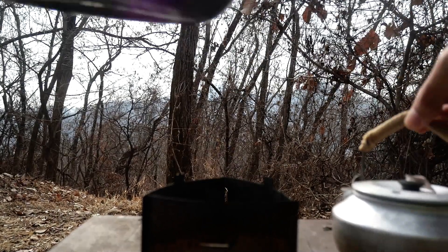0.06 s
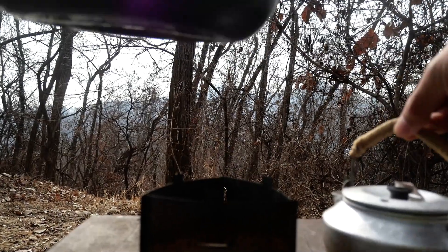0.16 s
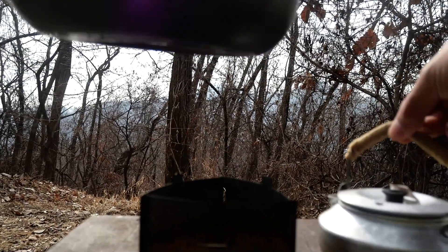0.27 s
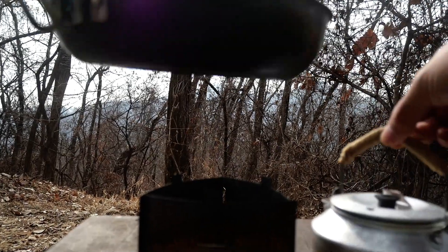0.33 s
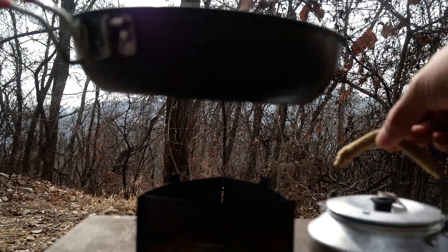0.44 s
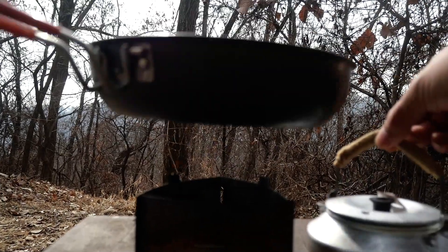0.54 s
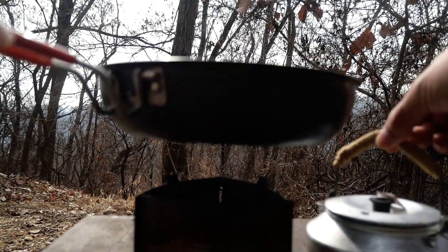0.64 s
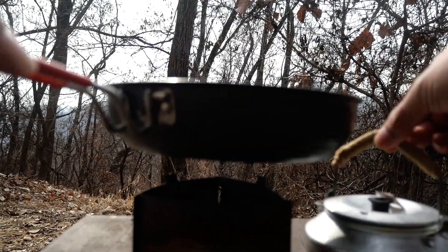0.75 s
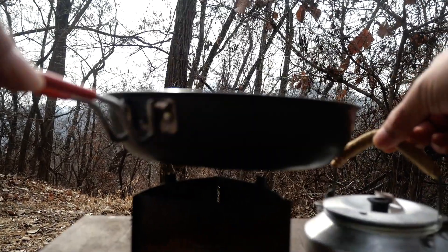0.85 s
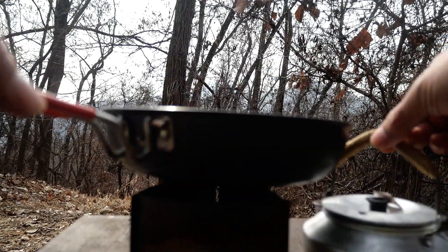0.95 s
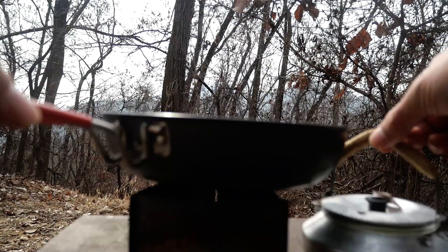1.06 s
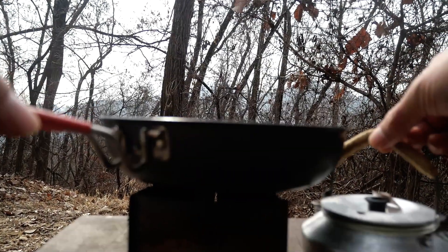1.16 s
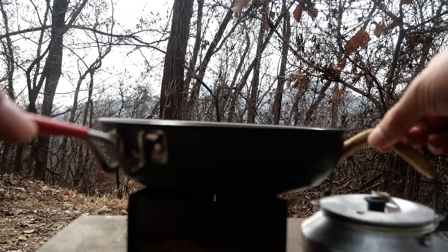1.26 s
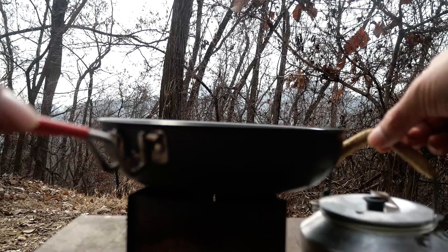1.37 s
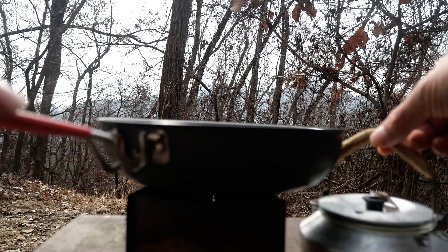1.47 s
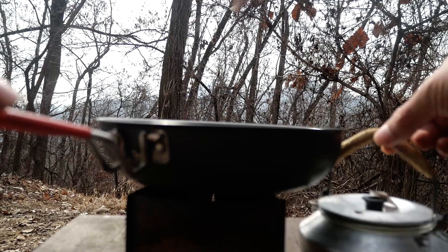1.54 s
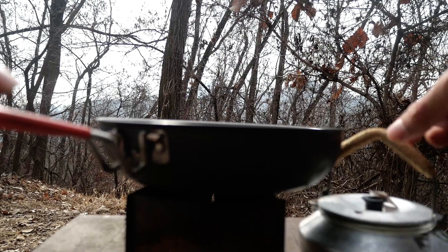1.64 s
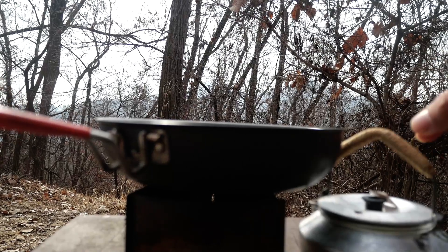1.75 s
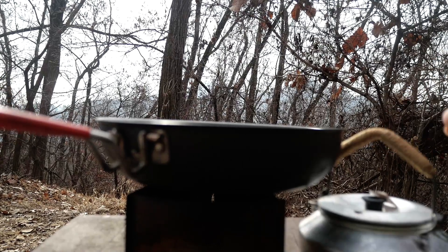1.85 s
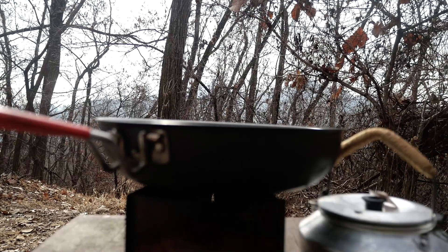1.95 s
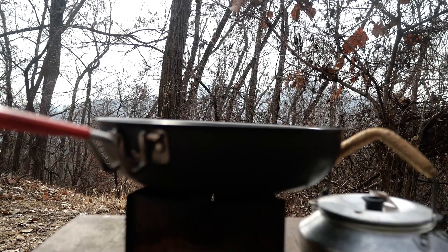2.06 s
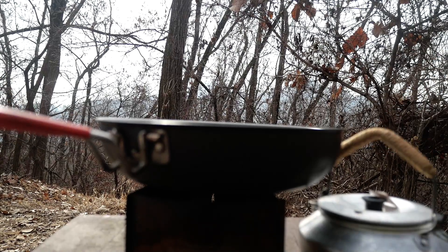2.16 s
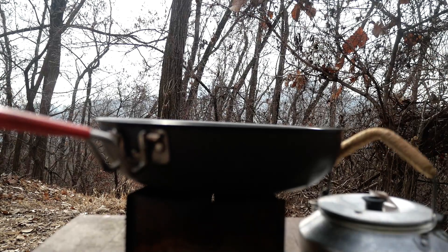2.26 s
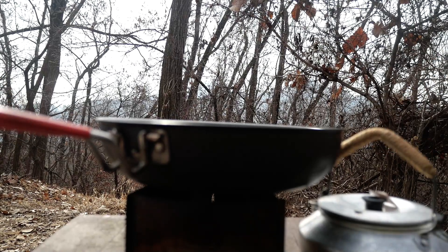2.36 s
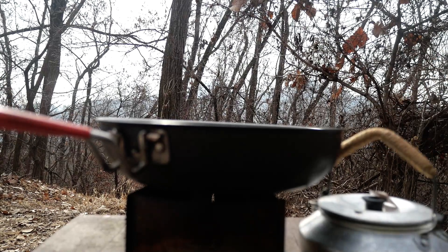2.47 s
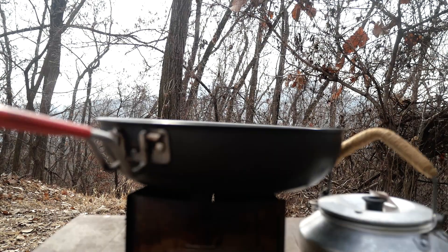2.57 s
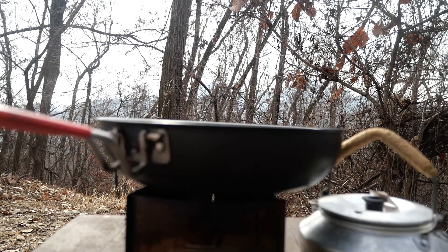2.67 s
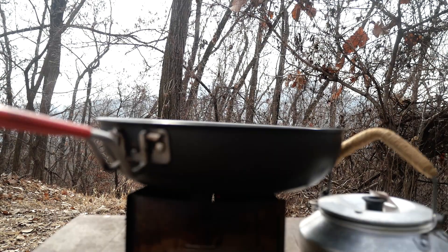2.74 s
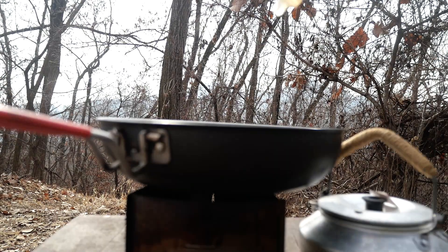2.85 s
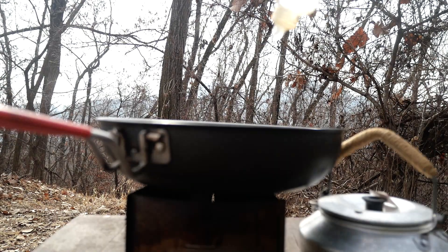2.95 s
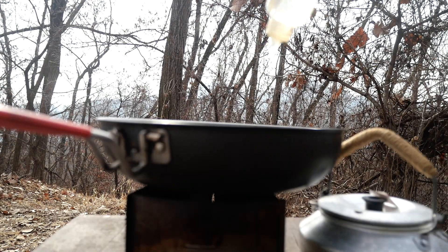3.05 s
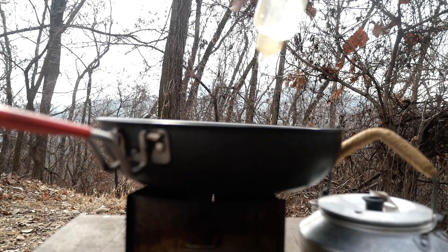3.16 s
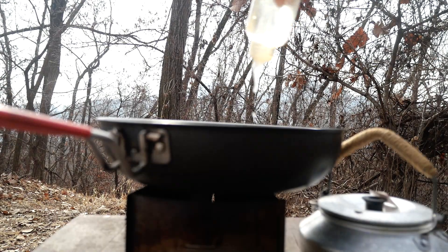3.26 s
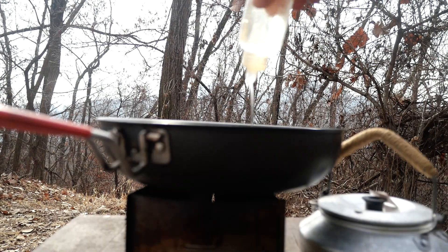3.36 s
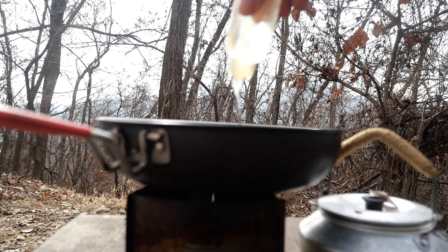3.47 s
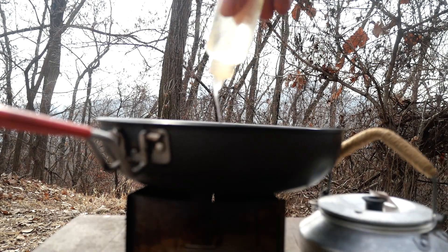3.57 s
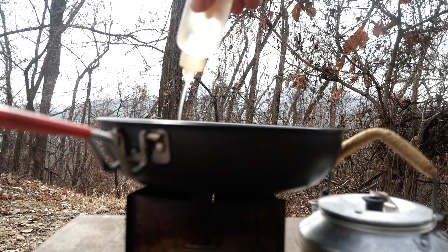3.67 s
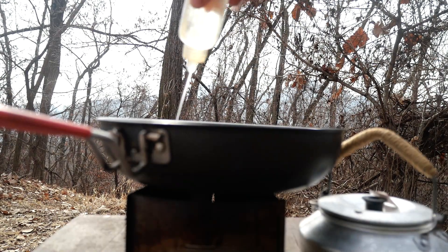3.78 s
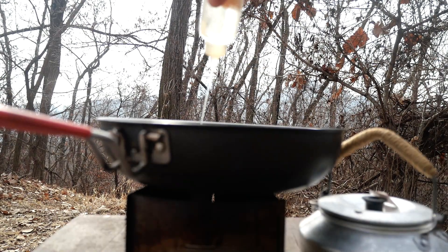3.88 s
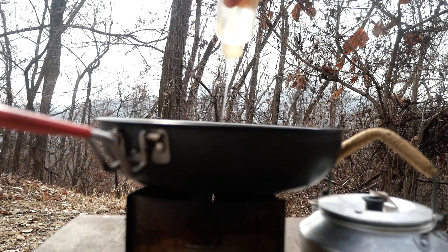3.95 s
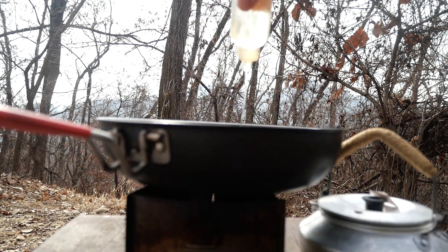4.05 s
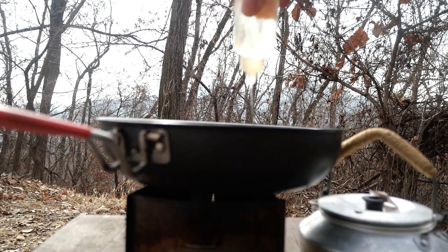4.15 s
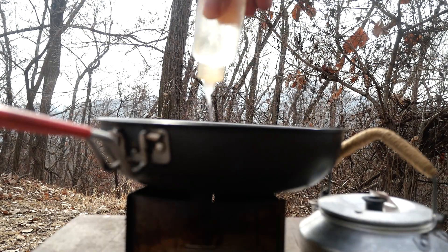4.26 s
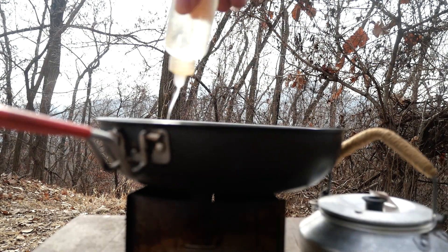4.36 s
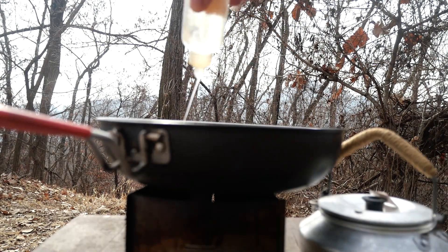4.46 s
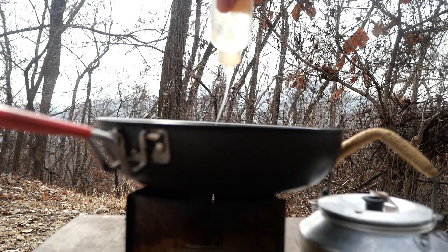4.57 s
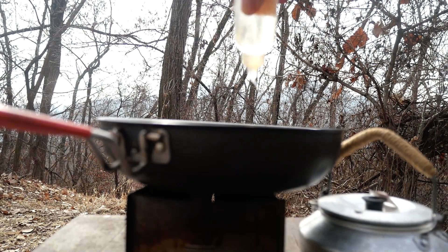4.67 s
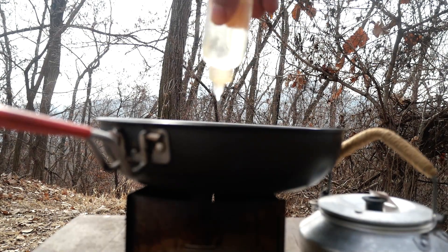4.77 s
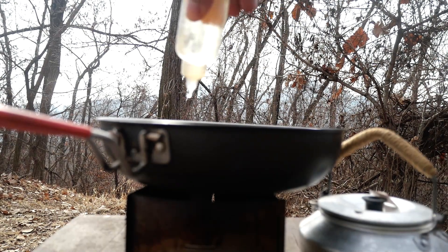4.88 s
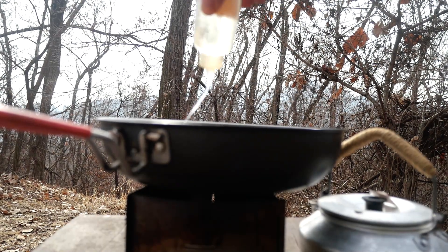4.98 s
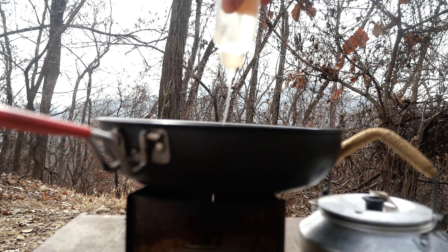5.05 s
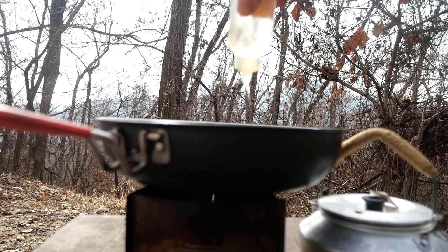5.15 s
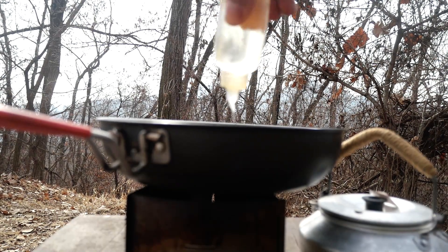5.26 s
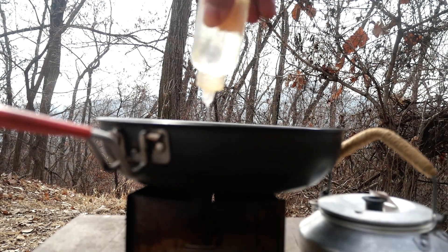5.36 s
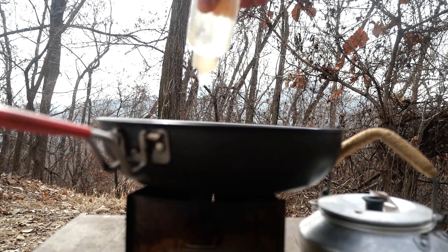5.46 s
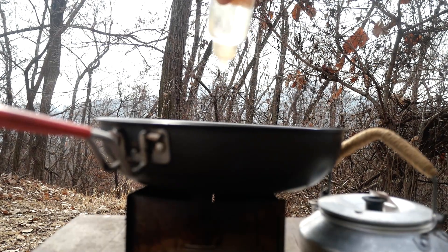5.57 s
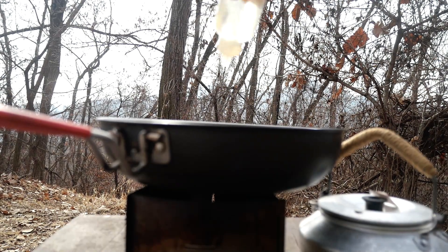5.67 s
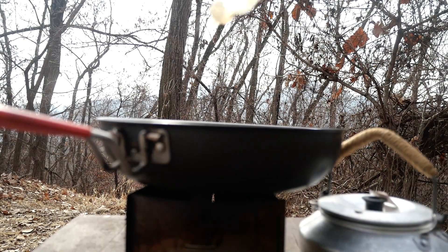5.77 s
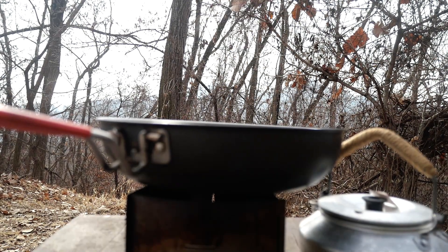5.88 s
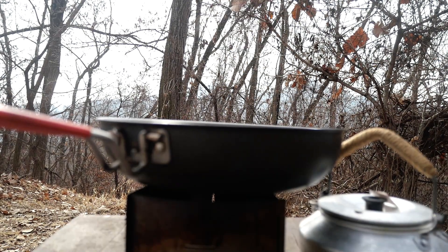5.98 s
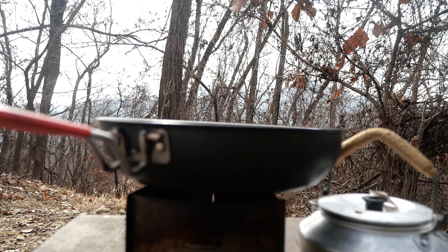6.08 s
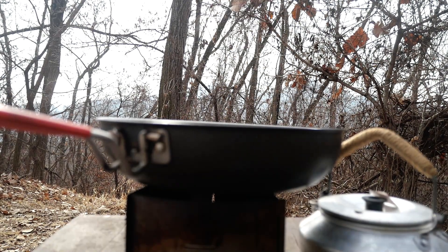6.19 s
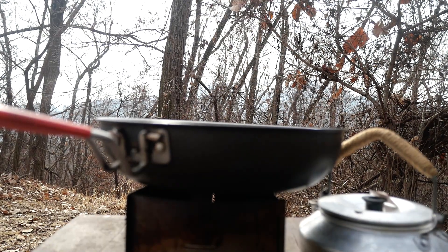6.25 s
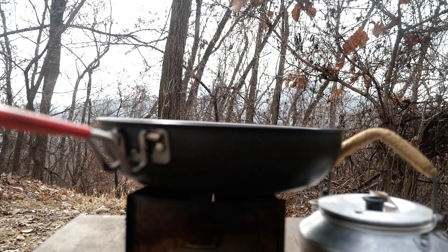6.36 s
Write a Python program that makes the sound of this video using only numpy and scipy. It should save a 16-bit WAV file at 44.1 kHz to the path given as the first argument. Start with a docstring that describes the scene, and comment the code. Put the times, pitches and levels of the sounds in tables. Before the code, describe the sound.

Very quiet, still woodland air with a faint wavering drone, heard close up at a camp table. Sleeves rustle with a fine treble hiss from 0.2 s, with a light knock at 0.3. At about 0.56 a metal kettle bumps dully onto the table, its lid rattling briefly. A faint squeak near 0.9 and small knocks around 1.0 precede the main clank: a frying pan edge hits a thin steel stove at 1.18, then rocks in a tight clatter from 1.29 to 1.43, gritty and bright, its ring choking quickly into short low hums by 1.65. Soft taps come around 2.0; the sound drops out for an instant at 2.55, then hiss and knocks at 2.65-2.8. Faint oil squirts and ticks swish from 3.3 to 4.4, barely again at 5.2. A plastic bottle sucks air with a thin sinking whistle from 5.4 and snaps sharply at 5.71. Dull knocks and rustle close at 5.8-6.4.

```python
"""A frying pan clanks onto a small sheet-steel stove outdoors, rocks and settles, ringing as a sum of decaying
modes; shortly before, a metal kettle is set down on a table as damped modes with a rattling lid.
Small knocks and ticks are short bursts of coloured noise. Thin squirts of oil are showers of grains, and their
plastic bottle draws in a whistle of air and snaps back into shape in resonant noise bursts. Sleeves rustle and
a treble hiss swells, both as noise, over faint woodland air; the sound drops out once for an instant."""
import sys
import numpy as np
from scipy import signal
from scipy.fft import rfft, irfft
from scipy.io import wavfile

SR = 44100
rng = np.random.default_rng(int(sys.argv[2]) if len(sys.argv) > 2 else 0)


def transcribe(signal):
    """Save signal, clipped to [-1, 1], as a 16-bit WAV file at the path in sys.argv[1]."""
    frames = np.atleast_2d(signal).T
    limited = np.clip(frames, -1, 1)
    pcm = np.round(limited * 32767).astype(np.int16)
    wavfile.write(sys.argv[1], SR, pcm)


N = 283116
T = np.arange(N) / SR  # time axis of the scene [s]
RING_T = T[:16384]  # time axis of one struck sound [s]

# blows of the pan on the stove: (time [s], ring level [dB], contact place [0 edge - 1 base],
# clatter level [dB], clatter T60 [s], contact cut-off [Hz], table thump level [dB],
# pitch of the support that is hit [Hz], support level [dB])
PAN_BLOWS = [(1.1766, 1.5, 0.023, -18.5, 0.086, 6600, -37.5, 943, -22),
             (1.286, 3, 0.79, -22, 0.062, 9600, -37, 2486, -18.5),
             (1.3176, 2.5, 0.97, -18, 0.043, 10000, -35, 2000, -19.5),
             (1.3229, -12, 0.18, -35, 0.079, 7000, -40.5, 688, -19),
             (1.3365, 1.5, 1, -25.5, 0.053, 9000, -38.5, 777, -20.5),
             (1.3519, -1, 0.99, -28.5, .065, 9000, -40.5, 2620, -26),
             (1.393, -25, 0.17, -38, 0.19, 2000, -48, 1115, -26),
             (1.413, -17.5, 0.47, -56, 0.052, 1510, -35.5, 203, -36),
             (1.4346, -26, 0.37, -28, 0.081, 4660, -52, 2600, -28.5)]
# modes of the table top: (frequency [Hz], level [dB], T60 [s])
TABLE_MODES = [(88.9, -11.5, 0.24), (173, -1.5, 0.14), (231, -0.5, 0.13), (275, -7.5, .08), (325, -7, .07)]
# width of the near sound field: (frequency [Hz], side minus mid [dB])
NEAR_SIDE = [(80, -9), (250, -12.5), (800, -12), (2400, -8), (4400, -0.5), (8000, 0.5), (15000, -0.5)]


def undb(db):
    """Amplitude ratio: 20 dB is a factor of ten."""
    return 10 ** (np.asarray(db) / 20)


def panned(db):
    """Level difference between channels: left minus right, shared evenly as two gains."""
    return undb(np.array([[db], [-db]]) / 2)


def add(out, s, x):
    """Superposition: mix a sound in at time s."""
    i = int(s * SR)
    out[:, i:i + x.shape[1]] += x[:, :N - i]


def fade(t60):
    """Exponential decay: the level falls by 60 dB in t60 seconds."""
    return undb(-60 * RING_T / t60)


def shape(points, hz):
    """Spectral envelope: a (frequency [Hz], level [dB]) table interpolated over log frequency, as gain."""
    f, db = np.transpose(points)
    return undb(np.interp(np.log(hz + 1), np.log(f + 1), db))


def resonance(hz, centre_hz, width_hz):
    """Resonance: response peaks at the centre and falls off on either side."""
    return 1 / np.sqrt(1 + ((hz ** 2 - centre_hz ** 2) / (width_hz * hz + 1)) ** 2)


def contact(hz, cut_hz):
    """Contact time: a softer contact pushes for longer and leaves out the treble."""
    return 1 / np.sqrt(1 + (hz / cut_hz) ** 4)


def radiated(x, low_hz):
    """Radiation efficiency: a small object sends out little sound below its lowest mode."""
    return signal.sosfilt(signal.butter(3, low_hz, "high", fs=SR, output="sos"), x)


def pressed(x, rise_s):
    """Gradual onset: force builds up exponentially towards its full value."""
    return x * (1 - np.exp(-RING_T[:x.shape[1]] / rise_s))


def noise(size, gain, width):
    """Filtered noise: random phases coloured by gain(Hz), a side share for width, unit rms in the mid."""
    hz = np.arange(size // 2 + 1) * SR / size
    mid, side = np.exp(2j * np.pi * rng.random((2, len(hz))))
    side_share = shape(width, hz)
    spectrum = gain(hz) * (mid + side_share * side * np.array([[1], [-1]]))
    x = irfft(spectrum, size)
    return x / np.std(x.mean(axis=0))


def burst(gain, t60):
    """High modal density: many crowded, short-lived modes merge into coloured noise that dies away."""
    envelope = fade(t60)
    x = noise(len(RING_T), gain, NEAR_SIDE) * envelope
    # every draw carries the same energy in the mid
    return x * np.sqrt(np.sum(envelope ** 2) / np.sum(x.mean(axis=0) ** 2))


def ring(modes, cut_hz, damping=1):
    """Modal superposition: decaying sines after one blow, slightly detuned as no two blows ring alike."""
    detune = 1 + 0.0063 * rng.standard_normal(len(modes))
    x = 0
    for k, (hz, db, t60) in enumerate(modes):
        strength = (-1) ** k * undb(db) * contact(hz, cut_hz)  # neighbours start in opposite polarity
        x = x + strength * fade(t60 / damping) * np.sin(2 * np.pi * hz * detune[k] * RING_T)
    return radiated(x, .75 * modes[0][0])[None]


def flutter(rate, depth_db):
    """Random amplitude modulation: a gain that wanders between `rate` random levels per second."""
    steps = rng.standard_normal(int(N / SR * rate) + 2)
    return undb(depth_db * np.interp(T * rate, np.arange(len(steps)), steps))


def swells(rows):
    """Power summation: gain of (middle [s], length [s], level [dB]) gestures that swell and sink alike."""
    squareness = 2.3  # 2 is a bell, more has a flatter top
    power = 0
    for s, length, db in rows:
        distance = np.abs(2 * (T - s) / length) ** squareness
        power = power + undb(2 * db) * np.exp(-np.minimum(distance, 100))
    return np.sqrt(power)


def grains(per_s, gain, channels=1):
    """Shot noise: tiny clicks at random times, coloured by gain(Hz) and brought to unit rms."""
    clicks = (rng.random(N) < per_s / SR) * rng.standard_normal((channels, N))
    x = irfft(rfft(clicks) * gain(np.arange(N // 2 + 1) * SR / N), N)
    return x / np.std(x)


def background():
    """Ambient noise: still woodland air with a faint drone of narrow-band noise that wavers."""
    # woodland air: (frequency [Hz], relative level [dB])
    wood_colour = [(20, -15.5), (55, 3.5), (120, 2), (200, -0.5), (400, -2.5), (600, -4), (760, -1.5),
                   (1050, -5.5), (1500, -11), (2400, -16), (3500, -13.5), (7500, -16.5), (10000, -22),
                   (14000, -17.5)]
    # width of the far sound field: (frequency [Hz], side minus mid [dB])
    far_side = [(60, -7), (110, -11), (200, -6.5), (380, -3), (700, -6.5), (1290, -1.5), (2380, 1),
                (4400, 1.5), (8120, 0), (15000, -0.5)]
    air = undb(-67) * flutter(11, 1.0) * noise(N, lambda hz: shape(wood_colour, hz), far_side)
    drone_hz, drone_width_hz, drone_db = 742, 120, -79
    hum = noise(N, lambda hz: resonance(hz, drone_hz, drone_width_hz) ** 2, far_side)
    return air * panned(.8) + undb(drone_db) * flutter(8, 3) * hum


def sleeves(crinkles_per_s=60, crinkle_db=-11, crinkle_hz=1700, crinkle_width_hz=1500):
    """Cloth friction: sleeves rustle unevenly with small crinkles; a fine treble hiss swells and sinks."""
    # swells of rustle and treble hiss: (middle [s], length [s], rustle level [dB], hiss level [dB])
    swell_rows = [(0.196, .22, -68, -61.5), (0.46, 0.38, -60, -58), (.765, .13, -56.5, -67),
                  (0.972, 0.29, -63.5, -64.5), (1.5, 0.32, -64.5, -67.5), (2.05, .9, -70.5, -69.5),
                  (2.51, 0.15, -80.5, -65.5), (2.648, 0.13, -61.5, -54.5), (3.1, 0.99, -74.5, -76.5),
                  (3.463, 0.12, -71, -73), (6.13, 0.37, -68, -71), (6.345, 0.22, -64, -58)]
    # soft rustle: (frequency [Hz], relative level [dB])
    rustle_colour = [(59, -38), (100, -12), (241, -2.5), (300, -4), (854, -6.5), (1480, -12.5), (2760, -24),
                     (3200, -18), (8000, -30.5), (10400, -58), (17600, -120)]
    # fine treble hiss: (frequency [Hz], relative level [dB])
    hiss_colour = [(1470, -38.5), (2500, -6.5), (3150, -9.5), (3560, -9), (6870, -2), (8860, -2.5),
                   (14300, 0.5), (15800, -2.5)]
    rustle_swell = swells([(s, length, db) for s, length, db, _ in swell_rows])
    hiss_swell = swells([(s, length, db) for s, length, _, db in swell_rows])
    rustle = flutter(70, 1.5) * noise(N, lambda hz: shape(rustle_colour, hz), NEAR_SIDE)
    crinkle_colour = lambda hz: resonance(hz, crinkle_hz, crinkle_width_hz) ** 2
    crinkle = undb(crinkle_db) * grains(crinkles_per_s, crinkle_colour)
    treble_hiss = hiss_swell * noise(N, lambda hz: shape(hiss_colour, hz), NEAR_SIDE)
    return rustle_swell * (rustle + crinkle) + treble_hiss * panned(4.5)


def knocks():
    """Damped resonance: light, dull knocks of hands and gear, each one broad band of noise."""
    # small handling knocks: (time [s], level [dB], centre [Hz], T60 [s])
    knock_rows = [(.292, -51, 313, .04), (.552, -39.5, 597, 0.097), (.971, -51.5, 600, .04),
                  (1.0245, -49, 1080, 0.045), (1.985, -50.5, 1030, 0.017), (2.033, -48.5, 690, 0.016),
                  (2.135, -49.5, 690, 0.012), (2.678, -49, 600, 0.039), (2.801, -51, 520, .045),
                  (3.008, -58.5, 403, .049), (3.094, -51, 684, .02), (3.442, -53.5, 560, .039),
                  (3.466, -45, 500, 0.026), (5.76, -52, 602, 0.032), (5.912, -50, 595, 0.083),
                  (5.937, -52.5, 520, 0.043), (5.957, -50, 470, 0.046), (6.114, -56, 560, .035),
                  (6.256, -55.5, 380, 0.073)]
    width = 0.88  # as a share of the centre
    out = np.zeros((2, N))
    for s, db, centre_hz, t60 in knock_rows:
        colour = lambda hz: resonance(hz, centre_hz, width * centre_hz) * contact(hz, 1.46 * centre_hz)
        add(out, s, undb(db) * burst(colour, t60))
    return out * panned(-.8)


def kettle(rise_s=0.0011, tail_db=-17):
    """Coupled impact: the base bumps the table, which it damps, and the lid rattles, most at the last blow."""
    # kettle on the table: (time [s], ring level [dB], rattle level [dB], contact cut-off [Hz],
    # table thump level [dB])
    kettle_blows = [(.5615, -10, -25.5, 2190, -51), (.5722, 16.5, -23, 500, -20),
                    (.576, -11, -25.5, 2800, -32), (.589, 7, -24, 1320, -43),
                    (.5963, 1.5, -18.5, 11000, -39)]
    # modes of the kettle: (frequency [Hz], level [dB], T60 [s])
    kettle_modes = [(544, -42, 0.054), (654, -24, 0.015), (870, -39, 0.02), (1344, -35, 0.035),
                    (1963, -27.5, .04), (2770, -38, 0.071), (4250, -41.5, 0.17), (4520, -40.5, 0.037),
                    (5210, -32, 0.044)]
    # rattle: (frequency [Hz], relative level [dB])
    rattle_colour = [(120, -43.5), (200, -11), (702, -4), (1170, -15), (1300, -7), (1840, -11), (2020, 3),
                     (2380, -33), (2800, 0.5), (3300, -23), (5200, -7), (5800, -16.5), (15500, -26)]
    out = np.zeros((2, N))
    for s, ring_db, rattle_db, cut_hz, thump_db in kettle_blows:
        colour = lambda hz: shape(rattle_colour, hz) * contact(hz, cut_hz)
        rattle = undb(rattle_db) * (burst(colour, 0.033) + undb(tail_db) * burst(colour, 0.12))
        thump = undb(thump_db) * ring(TABLE_MODES, cut_hz, damping=3.6)
        body = undb(ring_db) * ring(kettle_modes, cut_hz)
        add(out, s, pressed(body + rattle + thump, rise_s))
    return out * panned(-1.7)


def squeak(centre_hz=3280, width_hz=260):
    """Friction-driven resonance: rubbing at the pan's handle joint excites one narrow band."""
    # faint squeaks: (middle [s], length [s], level [dB])
    squeak_rows = [(.87, .19, -71)]
    tone = noise(N, lambda hz: resonance(hz, centre_hz, width_hz) ** 2, NEAR_SIDE)
    return swells(squeak_rows) * flutter(40, 2.3) * tone


def ticks():
    """Broadband impulse: tiny, dry ticks of metal and of oil drops, each a short burst."""
    # ticks: (time [s], level [dB], centre [Hz])
    tick_rows = [(1.026, -57, 6500), (1.632, -55, 7000), (3.025, -61, 2000), (3.337, -62.5, 2500),
                 (3.616, -61, 1800), (3.682, -63, 1490), (4.293, -63, 2500), (4.401, -59.5, 4000),
                 (5.172, -66, 1900)]
    t60_s, width = 0.02, 1.2  # width as a share of the centre
    out = np.zeros((2, N))
    for s, db, centre_hz in tick_rows:
        add(out, s, undb(db) * burst(lambda hz: resonance(hz, centre_hz, width * centre_hz), t60_s))
    return out


def seating(load_power=1.6):
    """Loading and damping: the stove takes the pan's weight, as load 0-1 and added damping in dB/s."""
    # held on one edge at first, the pan then rocks on the supports, then lies flat with its whole weight
    rocks_s, flat_s = 1.295, 1.398
    rocking_db_per_s = 58
    choke_db_per_s, choke_s = 720, 0.034  # lying flat chokes the ring for a moment
    touch_s = PAN_BLOWS[0][0]
    load = np.clip((T - touch_s) / (flat_s - touch_s), 0, 1) ** load_power
    choke = (T > flat_s) * np.exp(-np.abs(T - flat_s) / choke_s)
    return load, rocking_db_per_s * (T > rocks_s) + choke_db_per_s * choke


def shimmer(count=70):
    """Dense upper modes: many faint sines scattered at random over the treble die away together."""
    low_hz, high_hz, t60_s = 5200, 15200, .19
    low_db, db_per_octave = -55, -8
    x = 0
    for spot, left, right in rng.random((count, 3)):
        hz = low_hz + spot * (high_hz - low_hz)
        db = low_db + db_per_octave * np.log2(hz / low_hz)
        x = x + undb(db) * np.sin(2 * np.pi * (hz * RING_T + np.array([[left], [right]])))
    return x * fade(t60_s)


def pan(rise_hz=40, right_lead_s=.00002):
    """Plate modes: the pan rings on; settling on the support stiffens its low modes and chokes the ring."""
    # modes of the pan: (frequency [Hz], level struck at the edge [dB], level struck at the base [dB],
    # T60 [s], left minus right [dB])
    pan_modes = [(689, -18, -22, .1, .4), (1003, -22.5, -35, .4, .6), (1125, -43, -48, .15, 0),
                 (1225, -37, -45, .11, 0), (1556, -41, -48, 1.2, -1.5), (2386, -26, -41, .42, .4),
                 (2604, -35, -34, .3, -1), (2910, -31, -43, .28, 1.3), (2993, -36, -47, .28, -10),
                 (3192, -49, -49, .25, 0), (3338, -20, -33, .19, -2), (3461, -41, -41, .11, 0),
                 (3564, -50, -46, .3, 0), (3662, -45, -39, .22, -12), (4061, -29, -43, .17, -7),
                 (4371, -39, -33, .36, 2), (4704, -43, -39, .22, 1), (4926, -39, -42, .11, 0),
                 (5511, -53, -49, .18, 0), (6557, -54, -50, .2, 0), (6724, -45, -50, .1, 0),
                 (7246, -51, -56, .21, 0)]
    out = np.zeros((2, N))
    load, damping = seating()
    upper_modes = shimmer()
    for s, ring_db, place, *_ in PAN_BLOWS:
        after = slice(int(s * SR), int(s * SR) + len(RING_T))
        choke = undb(ring_db - np.cumsum(damping[after]) / SR)
        add(out, s, choke * upper_modes)
        for hz, edge_db, base_db, t60, pan_db in pan_modes:
            # the lowest mode rises by rise_hz under full load, higher ones by ever less
            pitch = hz + rise_hz * load[after] * (pan_modes[0][0] / hz) ** 3
            phase = 2 * np.pi * (np.cumsum(pitch) / SR + hz * right_lead_s * np.array([[0], [1]]))
            db = edge_db + place * (base_db - edge_db)
            polarity = rng.choice([-1, 1])
            add(out, s, polarity * undb(db) * panned(pan_db) * choke * fade(t60) * np.sin(phase))
    return out


def stove(rise_s=0.0013, tail_db=-26, grit_db=-19, support_t60=0.055):
    """Impact transmission: each blow rings a support and the stove, clatters plates and thumps the table."""
    # loose plates of the stove: (frequency [Hz], relative level [dB])
    plate_colour = [(50, -50), (170, -19), (300, -16), (500, -42), (680, -13), (1200, -8), (1600, -20.5),
                    (2000, -13), (2250, -21.5), (2600, -8.5), (3200, -15.5), (4600, -15), (5600, -22.5),
                    (9000, -28.5), (15500, -40.5)]
    # modes of the stove body: (frequency [Hz], level relative to the clatter [dB], T60 [s])
    stove_modes = [(654, -7.5, 0.071), (793, -12.5, 0.054), (1197, -10.5, 0.041), (2570, -4.5, .05)]
    out = np.zeros((2, N))
    for s, _, _, clatter_db, t60, cut_hz, thump_db, support_hz, support_db in PAN_BLOWS:
        colour = lambda hz: shape(plate_colour, hz) * contact(hz, cut_hz)
        plates = burst(colour, t60) + undb(tail_db) * burst(colour, .33)
        # the base grinds briefly on the supports
        grit_colour = lambda hz: resonance(hz, 6000, 12000) * contact(hz, 1.6 * cut_hz)
        grit = undb(grit_db) * burst(grit_colour, .028)
        support = ring([(support_hz, support_db, support_t60)], cut_hz)
        body = undb(clatter_db) * (plates + grit + ring(stove_modes, cut_hz))
        thump = undb(thump_db) * ring(TABLE_MODES, cut_hz)
        add(out, s, pressed(body + support + thump, rise_s))
    return out * panned(0.91)


def scrape(slips_per_s=3000):
    """Stick-slip friction: fine grit while the base slides into place."""
    # slides of the pan on the supports: (middle [s], length [s], level [dB])
    slides = [(1.3, .022, -51), (1.343, .036, -42)]
    return swells(slides) * grains(slips_per_s, lambda hz: resonance(hz, 4800, 4500), channels=2)


def hums(rise_s=.005):
    """Free decay: single modes linger after the last blow, then brief low hums of the settled pan."""
    # lingering modes and low hums: (time [s], frequency [Hz], level [dB], T60 [s])
    hum_rows = [(1.44, 2590, -48, 0.26), (1.445, 3130, -45, 0.19), (1.489, 722, -45.5, 0.12),
                (1.632, 727.5, -45, 0.13), (1.655, 710, -41, 0.055)]
    out = np.zeros((2, N))
    for s, hz, db, t60 in hum_rows:
        add(out, s, undb(db) * pressed(ring([(hz, 0, t60)], 2 * hz), rise_s))
    return out


def oil(drops_per_s=1200):
    """Superposed droplet impacts: thin squirts of oil swish softly onto the cold pan."""
    # squirts landing in the pan: (middle [s], length [s], level [dB])
    squirts = [(3.46, 0.13, -64.5), (3.65, 0.16, -76), (3.87, .05, -70), (4.3, 0.029, -75),
               (4.395, 0.027, -67.5), (5.21, .07, -76.5)]
    # swish: (frequency [Hz], relative level [dB])
    oil_colour = [(300, -19.5), (900, -6), (1500, 2), (2500, -7.5), (3800, -6), (7000, -17), (15000, -16)]
    return swells(squirts) * grains(drops_per_s, lambda hz: shape(oil_colour, hz))


def intake(width_hz=170, spread_hz=650, spread_db=-3):
    """Turbulent whistle: as the grip eases, air enters the nozzle; noise modulates a tone of sinking pitch."""
    # draws of air: (time [s], hold [s], level [dB], first whistle [Hz], T60 [s])
    draws = [(5.417, 0.034, -67, 5400, 0.74), (5.715, 0.13, -64, 3890, 0.32)]
    rest_hz, sag_s, attack_s = 3680, .036, .012  # the whistle sinks to rest_hz as suction eases
    out = np.zeros((2, N))
    for s, hold_s, db, first_hz, t60 in draws:
        pitch = rest_hz + (first_hz - rest_hz) * np.exp(-RING_T / sag_s)
        tone = np.sin(2 * np.pi * np.cumsum(pitch) / SR)
        release = np.minimum(fade(t60) * undb(60 * hold_s / t60), 1)
        # a narrow whistle inside a wider rush of air
        narrow = noise(len(RING_T), lambda hz: contact(hz, width_hz), NEAR_SIDE)
        wide = noise(len(RING_T), lambda hz: contact(hz, spread_hz), NEAR_SIDE)
        turbulence = narrow + undb(spread_db) * wide
        add(out, s, pressed(undb(db) * release * turbulence * tone, attack_s))
    return out


def bottle(crack_db=-42, hollow_db=-20, wall_top_hz=4800):
    """Snap-through buckling: air whistles in and the dented plastic pops out in a few quick steps."""
    # the wall buckles back: (time [s], level [dB], centre [Hz], width [Hz], T60 [s])
    snaps = [(5.412, -62, 2810, 2500, .012), (5.476, -60, 1900, 1800, .014), (5.598, -51, 1607, 500, 0.022),
             (5.7092, -38, 1880, 1500, 0.018), (5.7136, -26.5, 3500, 2200, 0.016),
             (5.718, -28.5, 2940, 1190, 0.015), (5.7215, -33.5, 2060, 1640, 0.03),
             (5.7275, -44.5, 1280, 1980, 0.046), (5.838, -48, 4150, 500, 0.018),
             (5.8383, -51.5, 1210, 400, 0.028)]
    out = intake()
    for s, snap_db, centre_hz, width_hz, t60 in snaps:
        wall = burst(lambda hz: resonance(hz, centre_hz, width_hz) ** 2, t60)
        hollow = undb(hollow_db) * burst(lambda hz: resonance(hz, 650, 700) ** 2, 0.025)
        add(out, s, undb(snap_db) * (wall + hollow))
    # soft plastic is dull: only the hardest snap cracks right up into the treble
    out = signal.sosfilt(signal.butter(5, wall_top_hz, fs=SR, output="sos"), out)
    hardest = max(snaps, key=lambda snap: snap[1])
    add(out, hardest[0], undb(crack_db) * burst(lambda hz: resonance(hz, 8500, 4000), 0.01))
    return radiated(out, 240) * panned(0.512)


def scene():
    """Linear superposition of everything around the stove."""
    cookware = kettle() + squeak() + radiated(pan(), 620) + radiated(stove(), 64) + scrape() + hums()
    return background() + sleeves() + knocks() + cookware + ticks() + oil() + bottle()


def record(dry):
    """Band limiting: the sound drops out for an instant, and the top is cut steeply."""
    top_hz = 15850
    gap = (T > 2.552) & (T < 2.568)
    return signal.sosfilt(signal.ellip(10, .2, 70, top_hz, fs=SR, output="sos"), dry * ~gap)


dry = scene()
out = record(dry)
transcribe(out)
```